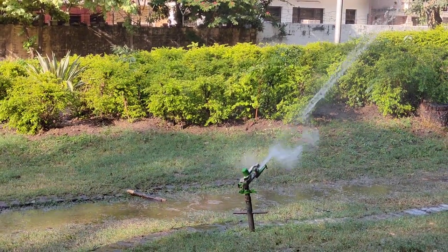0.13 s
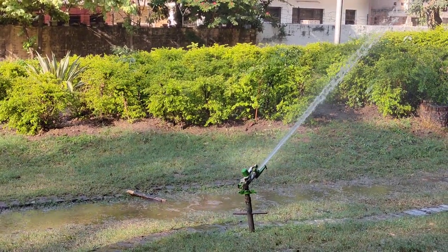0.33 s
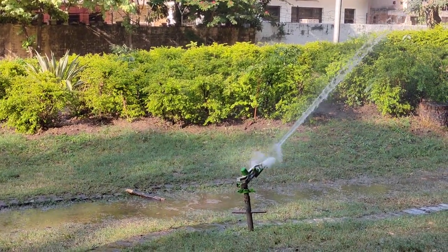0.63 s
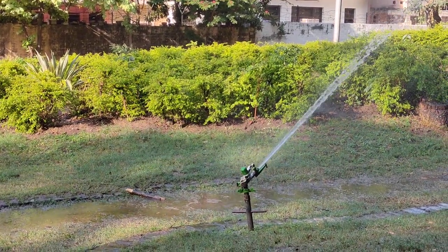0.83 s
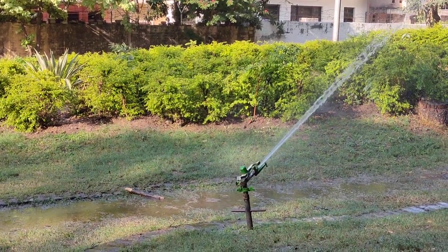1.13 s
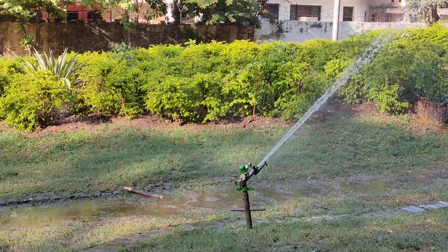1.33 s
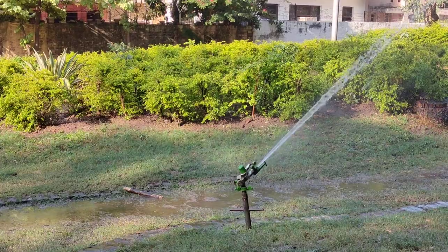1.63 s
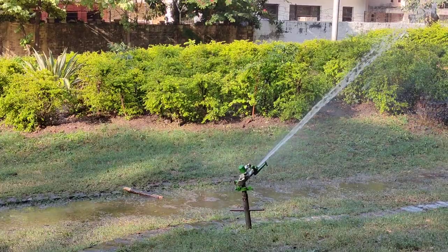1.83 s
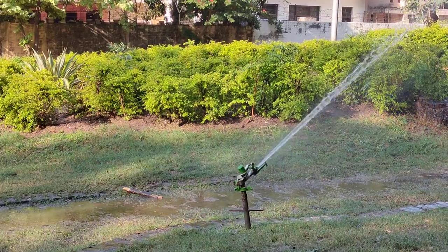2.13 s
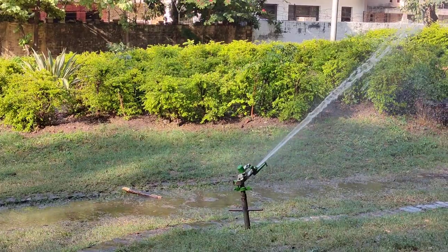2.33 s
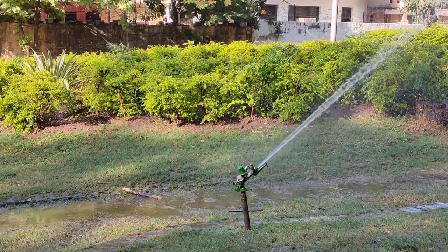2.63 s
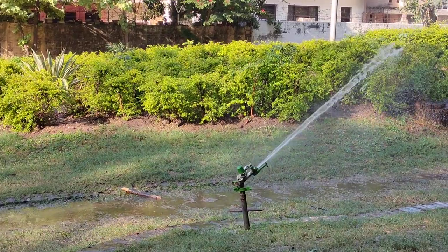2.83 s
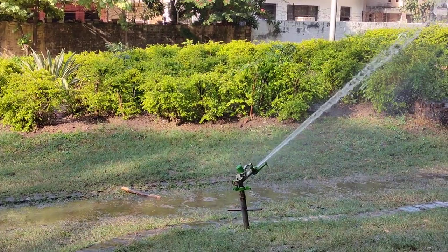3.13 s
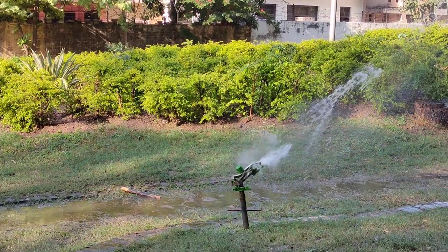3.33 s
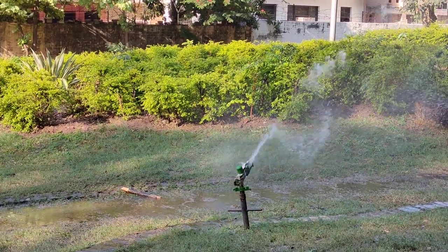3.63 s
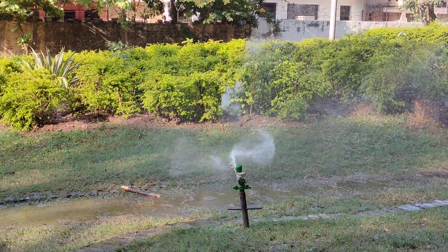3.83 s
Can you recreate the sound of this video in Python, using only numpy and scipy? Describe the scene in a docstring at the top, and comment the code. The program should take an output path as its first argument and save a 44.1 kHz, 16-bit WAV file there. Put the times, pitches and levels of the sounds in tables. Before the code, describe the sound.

A lawn impact sprinkler gives sharp, dry metallic-plastic clacks from 0.2 to 3.35 seconds, about every 0.26 seconds, each with a tiny rattle and a short hissing spray burst full of droplets. From 3.45 seconds it chatters about fifteen times a second, splashier and softer, until near the end at 4. Faint jet hiss persists; irregular low wind puffs thump the close-sounding stereo microphone, with slight garden reflections.

```python
"""Impact sprinkler on a lawn

The swinging arm cuts the jet nearly four times a second: struck modes ring and spray bursts as noise and drops.
It then trips into a fast return, chattering at about fifteen strokes a second. The free jet hisses
throughout as coloured noise, a near surface reflects the strokes, and puffs of wind buffet the microphone
ports as low rumble, rasp and slaps."""
import sys
import numpy as np
from scipy import signal
from scipy.fft import rfft, irfft, next_fast_len
from scipy.io import wavfile
from scipy.ndimage import uniform_filter1d, map_coordinates

SR = 44100
rng = np.random.default_rng(int(sys.argv[2]) if len(sys.argv) > 2 else 0)


def master(y):
    """Save y as 16-bit WAV."""
    cut = np.clip(np.atleast_2d(y).T, -1, 1)
    pcm = np.round(cut * 32767)  # scale
    wavfile.write(sys.argv[1], SR, pcm.astype(np.int16))


N = 176400  # samples: 4 s

# Knocks of the slow forward strokes: start_s, relative level_db
FORWARD_STROKES = [(0.219, -19.5), (0.48, -21), (0.7414, -20), (1.0023, -20.5), (1.2645, -20.5),
                   (1.5267, -20), (1.788, -20.5), (2.0489, -19.5), (2.3105, -19.5), (2.5698, -19.5),
                   (2.8302, -19.5), (3.0891, -19.5), (3.3493, -17.5)]
# Knocks of the fast return strokes: start_s, relative knock_db, relative spray_db
RETURN_STROKES = [(3.451, -19.5, -34), (3.516, -21, -34.5), (3.585, -22, -33.5), (3.652, -23, -35),
                  (3.718, -22, -35), (3.782, -25, -34.5), (3.843, -22.5, -36.5), (3.905, -23, -36),
                  (3.97, -24.5, -36)]
# Further contacts just before and after each knock, lighter or harder:
# delay_s, level_db re knock, centre_hz and width_hz of the modes they ring
FORWARD_RATTLE = [(-.0018, -16, 3160, 1000), (.0098, -6.5, 2970, 1400), (0.0156, -11.5, 2690, 1000),
                  (.024, -9, 3050, 600)]
RETURN_RATTLE = [(-.0215, -10.5, 2840, 1200), (-.0062, -8, 2300, 1300), (.0096, 3, 3220, 700)]
# Modes of the arm and head: pitch_hz, relative left_db, relative right_db, t60_s
HEAD_MODES = [(590, -16.5, -18.5, 0.02), (945, -29, -19.5, 0.026), (1346, -6.5, -9.5, 0.01),
              (1815, 0.5, -3.5, 0.017), (2075, -11.5, -12.5, 0.023), (2960, -12, -11, 0.039),
              (3303, -14, -14.5, 0.026), (3803, -5, -13.5, 0.024), (4440, -11, -28, 0.025),
              (6617, -4.5, -27, 0.039), (7830, -27, -11, 0.02)]
# Small ticks, some of them late bounces of the arm after a knock: start_s, level_db, pitch_hz
SMALL_TICKS = [(0.4395, -34, 1250), (0.4435, -39, 1550), (0.4475, -32.5, 2150), (.541, -34.5, 2350),
               (.767, -24.5, 2620), (3.371, -21, 3030), (3.404, -26, 2810)]
# Spectra of spray and jet hiss as picked up, with the colour and notches of microphones and recorder:
# frequency_hz, relative left_db, relative right_db
SPRAY_SPECTRUM = [(600, -10.5, -14), (1320, -9.5, -11), (1740, -0.5, -0.5), (2270, -2.5, -14),
                  (3070, -1, -1.5), (3830, -3.5, -7.5), (5110, -11.5, -16.5), (5750, -6, -5.5),
                  (6730, 4.5, -6.5), (6880, 0.5, -5), (7980, -10, 3), (9060, -8.5, -7.5),
                  (10600, -16.5, -14), (13600, -8, -19.5), (15800, -14, -18)]
HISS_SPECTRUM = [(400, 1, -2), (1050, -4, -3.5), (1630, -0.5, -3), (2220, -2, -3), (3450, -4, -4),
                 (4330, -7, -13.5), (5060, -17, -37), (5640, -7, -27), (6800, -0.5, -6), (7200, -4.5, -9.5),
                 (7850, -14, 0), (8900, -12.5, -9), (10460, -26, -31.5), (11900, -10.5, -32),
                 (13600, -2.5, -35), (16000, -14, -39)]
# Colour of the spray on the fast return: frequency_hz, gain_db over the forward spray
RETURN_COLOUR = [(800, -5), (1800, -1), (2900, 1), (4300, 1), (5500, -2.5), (7000, 0), (9500, 0.5),
                 (14000, -1)]
# Likeness of left and right in the water sounds: frequency_hz, correlation (no unit)
WATER_CORRELATION = [(400, 0.64), (1500, 0), (3000, 0.17), (5000, 0.033), (15000, 0.15)]
# Echo path delay from the near surface: left delay_s, right delay_s
ECHO_DELAYS = [0.0083, 0.0099]
# Eddies that slap a port: start_s, relative level_db, left_minus_right_db, pitch_hz
PORT_SLAPS = [(0.171, -28.5, -28, 231), (0.546, -25, -33, 330), (0.575, -28, -28, 260),
              (0.587, -25, -30, 280), (0.594, -28, -29, 240), (1.407, -24, -27, 240),
              (1.576, -22, -25.5, 255), (1.584, -25.5, -25.5, 200), (2.651, -31.5, 21, 170),
              (2.807, -28.5, -18, 230), (2.996, -23, -29, 223), (3.277, -26, -18, 302),
              (3.648, -25, -25, 204)]
# Puffs of wind: start_s (centre), length_s, relative left_db, relative right_db
WIND_PUFFS = [(0.104, 0.02, -58, -23.5), (0.146, 0.011, -58, -24), (0.175, 0.018, -45.5, -26),
              (0.261, 0.011, -60, -23), (0.283, 0.013, -60, -29), (0.358, 0.031, -61, -33),
              (0.404, 0.017, -51, -20), (0.576, 0.039, -43.5, -21), (0.624, 0.023, -50, -21.5),
              (0.75, 0.021, -29, -51), (0.937, 0.016, -50, -34.5), (1.135, 0.016, -50, -35.5),
              (1.378, 0.013, -48, -29), (1.414, 0.021, -54, -22), (1.456, 0.017, -48, -21.5),
              (1.503, 0.035, -34, -37), (1.534, 0.015, -35, -24), (1.572, 0.024, -35, -18),
              (1.775, 0.024, -50, -30.5), (1.809, 0.013, -35, -19.5), (1.954, 0.037, -25, -50),
              (2.013, 0.011, -32, -50), (2.655, 0.015, -32, -45), (2.758, 0.033, -42, -23),
              (2.795, 0.022, -38, -21.5), (2.907, 0.014, -46, -24.5), (2.958, 0.016, -54, -24),
              (2.995, 0.013, -60, -19), (3.133, 0.025, -58, -31.5), (3.186, 0.022, -53, -33),
              (3.242, 0.02, -45, -25.5), (3.259, 0.0085, -18, -38), (3.272, 0.022, -31, -23),
              (3.459, 0.036, -59, -23.5), (3.574, 0.027, -31.5, -41), (3.647, 0.018, -47, -22.5),
              (3.796, 0.033, -53, -34)]
# Wind spectra in the ports, body and rasp of strong puffs: frequency_hz, relative level_db
RUMBLE_SPECTRUM = [(20, -30), (50, -10), (90, 3.5), (140, -1.5), (250, -14), (450, -36.5), (1000, -58),
                   (3000, -100)]
RASP_SPECTRUM = [(60, -2), (200, 1), (400, -0.5), (800, -20), (1600, -50), (5000, -80)]
# Light breeze between the puffs, its spectrum: frequency_hz, relative level_db
BREEZE_SPECTRUM = [(20, -10), (45, -4), (90, 4), (140, -2.5), (250, -13), (450, -36), (1000, -38),
                   (3000, -100)]
# Level of the breeze over time: time_s, left_db, right_db
BREEZE_LEVEL = [(0, -43.5, -41), (.6, -47, -37.5), (1.1, -46, -45), (1.5, -44, -38.5), (1.95, -41, -42.5),
                (2.2, -50.5, -48), (2.55, -53, -47.5), (2.8, -50, -38), (3.3, -43, -38.5),
                (4, -47.5, -42.5)]

# Gains in dB, times in s, frequencies in Hz
KNOCK_DB, KNOCK_RISE_S = -2.5, 0.00078
CRACK_DB, RETURN_CRACK_DB, CRACK_T60_S = -13, -9.5, 0.0098
RETURN_TOP_HZ = 5500  # the lighter return blows leave higher modes quiet
TICK_T60_S = 0.0097
FORWARD_SPRAY_DB, GRAZE_DB, GRAZE_LEAD_S = -14.5, -5, 0.0079
RETURN_SPRAY_DB, SPLASH_DB, SPLASH_LEAD_S = -0.37, -8.5, 0.0057
DROP_DB, DROP_HZ, DROPS_PER_S = -10, 2880, 520
DROP_SPREAD, DROP_CYCLES = 0.382, 13.8  # spread of log pitch; decay in cycles to -60 dB
HISS_DB, MIST_DB, MIST_T60_S = -51, -31.5, 0.58
ECHO_DB, GARDEN_DB, GARDEN_T60_S = -12.5, -15, 0.14
SLAP_DB, SLAP_T60_S, SLAP_RISE_S, SLAP_TOP_HZ = 12, 0.012, 0.00054, 1180
PUFF_DB, RASP_DB = -0.5, -16
TOP_HZ = 15950


def knocks(scatter_db=1.6, detune=0.028, rattle_scatter_db=2.1, rattle_jitter_s=0.000785):
    """Modal excitation: each contact rings the head's short modes a little differently, with crack and rattle."""
    out = np.zeros((2, N))
    t = np.arange(SR // 10) / SR
    hz, left, right, t60 = np.transpose(HEAD_MODES)
    cracks = noise(SPRAY_SPECTRUM, WATER_CORRELATION)

    def strike(weight):
        """Modal superposition: one contact sums the weighted modes."""
        level, shift, phase = rng.standard_normal((3, len(hz)))
        pitch = hz * (1 + detune * shift)
        modes = ring(pitch[:, None], t60[:, None], KNOCK_RISE_S, np.pi * phase[:, None])
        gains = amp(np.array([left, right]) + scatter_db * level) * weight
        return gains @ modes

    soft = 1 / np.sqrt(1 + (hz / RETURN_TOP_HZ) ** 8)
    passes = [(FORWARD_STROKES, 1, CRACK_DB, FORWARD_RATTLE),
              (RETURN_STROKES, soft, RETURN_CRACK_DB, RETURN_RATTLE)]
    for strokes, weight, crack_db, rattle in passes:
        for s, db, *_ in strokes:
            cut = cracks[:, rng.integers(N - len(t)):][:, :len(t)]
            crack = cut * amp(crack_db - 60 * t / CRACK_T60_S)
            add(out, s, amp(db + KNOCK_DB) * (strike(weight) + crack))
            for delay, contact_db, centre, width in rattle:
                late, harder = rng.standard_normal(2)
                contact = strike(np.exp(-((hz - centre) / width) ** 2))
                gain = amp(db + contact_db + rattle_scatter_db * harder)
                add(out, s + delay + rattle_jitter_s * late, gain * contact)
    return out


def spray(grain_db=0.5, flutter_db=0.4, lead_s=0.049):
    """Jet break-up: the arm grazes, then shatters the jet; on the return it sits in the jet before each knock."""
    # Independent bursts add in power
    forward_power, return_power, splash_power = np.zeros((3, N))
    for s, db in FORWARD_STROKES:
        graze = amp(GRAZE_DB) * burst(s - GRAZE_LEAD_S, attack_s=0.0037, hold_s=0.004, t60_s=0.013)
        cut = burst(s, attack_s=0.0013, hold_s=0.016, t60_s=0.1)
        forward_power += amp(db + FORWARD_SPRAY_DB) ** 2 * (graze ** 2 + cut ** 2)
    for s, _, db in RETURN_STROKES:
        dip = burst(s - lead_s, attack_s=0.022, hold_s=0.024, t60_s=0.13)
        return_power += (amp(db + RETURN_SPRAY_DB) * dip) ** 2
        splash = burst(s - SPLASH_LEAD_S, attack_s=0.0063, hold_s=0.0099, t60_s=0.039)
        splash_power += (amp(db + SPLASH_DB) * splash) ** 2
    unevenness = amp(grain_db * wobble(1500) + flutter_db * wobble(220))
    water = unit(noise(SPRAY_SPECTRUM, WATER_CORRELATION) * unevenness)
    water = unit(water + amp(DROP_DB) * drops())
    returning = filtered(water, lambda hz: amp(along(RETURN_COLOUR, hz)))
    thrown = np.sqrt(splash_power) * drops()
    return np.sqrt(forward_power) * water + np.sqrt(return_power) * returning + thrown


def drops(size_db=5.5):
    """Impact superposition: many tiny decaying sines at random times make a dense patter of rms 1."""
    count = int(DROPS_PER_S * N / SR)
    pitch, size, sign = rng.standard_normal((count, 3)).T[:, :, None]
    k = np.arange(SR // 100)
    cycles = DROP_HZ * np.exp(DROP_SPREAD * pitch) * k / SR
    decay = amp(size_db * size - 60 * cycles / DROP_CYCLES)
    grains = decay * np.sin(2 * np.pi * cycles) * np.sign(sign)
    places = rng.integers(N, size=(count, 1)) + k
    return unit(np.bincount(places.ravel(), grains.ravel(), N)[:N])


def ticks():
    """Damped resonance: small single-mode ticks, some of them late bounces of the arm after a knock."""
    out = np.zeros((2, N))
    for s, db, hz in SMALL_TICKS:
        add(out, s, amp(db) * ring(hz, TICK_T60_S, rise_s=0.00056)[None])
    return out


def jet(waver_db=0.08, grain_db=1.45):
    """Turbulent noise: the free jet hisses steadily and a fading mist follows each stroke."""
    level = amp(HISS_DB + waver_db * wobble(22) + grain_db * wobble(900))
    steady = level * noise(HISS_SPECTRUM, WATER_CORRELATION)
    mist_power = np.zeros(N)
    for s, db, *_ in [*FORWARD_STROKES, *RETURN_STROKES]:
        mist = burst(s, attack_s=0.025, hold_s=0.032, t60_s=MIST_T60_S)
        mist_power += (amp(db + MIST_DB) * mist) ** 2
    return steady + np.sqrt(mist_power) * noise(SPRAY_SPECTRUM, WATER_CORRELATION)


def garden(x):
    """Reflection and scattering: one near echo and a short diffuse tail from lawn and hedge."""
    t = np.arange(SR // 4) / SR
    tail = rng.standard_normal((2, len(t))) * amp(-60 * t / GARDEN_T60_S)
    scatter = signal.fftconvolve(x, tail / np.linalg.norm(tail[0]), axes=1)[:, :N]
    # A linear phase response is a pure delay
    echo = filtered(x, lambda hz: np.exp(-2j * np.pi * np.outer(ECHO_DELAYS, hz)))
    return x + amp(GARDEN_DB) * scatter + amp(ECHO_DB) * echo


def slaps():
    """Pressure transient: the hardest eddies hit a port with a steep front and one quick swing."""
    out = np.zeros((2, N))
    for s, db, pan, hz in PORT_SLAPS:
        sides = unit(amp([[pan / 2], [-pan / 2]]))
        add(out, s, amp(db + SLAP_DB) * sides * ring(hz, SLAP_T60_S, SLAP_RISE_S))
    return filtered(out, lambda hz: 1 / (1 + 1j * hz / SLAP_TOP_HZ) ** 3)


def wind(lumps_db=3.0, rasp_grows=2.04, evenness=1.0):
    """Turbulent pressure: each port has its own rumble, and the strongest puffs turn raspy."""
    t = np.arange(N) / SR
    puff_power = np.zeros((2, N))
    for s, length, left, right in WIND_PUFFS:
        puff_power += amp([[left], [right]]) ** 2 * np.exp(-np.pi * ((t - s) / length) ** 2)
    puff = np.sqrt(puff_power)
    eddies = noise(RUMBLE_SPECTRUM)
    # Level out the rumble by its running power over 20 ms
    running_power = np.abs(uniform_filter1d(eddies ** 2, SR // 50, axis=1))
    eddies = unit(eddies / running_power ** (evenness / 2))
    when, *ports = np.transpose(BREEZE_LEVEL)
    breeze_gain = amp([np.interp(t, when, db) for db in ports])
    lumps = amp(lumps_db * np.array([wobble(30.13), wobble(30.03)]))
    breeze = breeze_gain * unit(noise(BREEZE_SPECTRUM) * lumps)
    # Rasp grows faster than the puff itself
    rasp_gain = amp(RASP_DB) * puff.max() * (puff / puff.max()) ** rasp_grows
    return amp(PUFF_DB) * puff * eddies + rasp_gain * noise(RASP_SPECTRUM) + breeze


def ring(hz, t60_s, rise_s, phase=0):
    """Damped oscillation: a sine with a short rise and exponential decay."""
    t = np.arange(SR // 10) / SR
    return np.sin(2 * np.pi * hz * t + phase) * amp(-60 * t / t60_s) * (1 - np.exp(-t / rise_s))


def burst(start, attack_s, hold_s, t60_s):
    """Envelope: straight rise, hold, exponential release."""
    t = np.arange(N) / SR - start
    release = amp(-60 * np.maximum(t - attack_s - hold_s, 0) / t60_s)
    return np.clip(t / attack_s, 0, 1) * release


def noise(spectrum, correlation=None):
    """Spectral shaping: coloured stereo noise of rms 1, with the given correlation of its sides."""
    pair = rng.standard_normal((2, N))
    if correlation is not None:
        def mid_side_gains(hz):
            """Correlation as an angle: the cosine of twice the angle is the likeness of the sides."""
            angle = np.arccos(np.clip(along(correlation, hz)[0], -1, 1)) / 2
            return np.array([np.cos(angle), np.sin(angle)])

        mid, side = filtered(pair, mid_side_gains)
        pair = np.array([mid + side, mid - side])
    return unit(filtered(pair, lambda hz: amp(along(spectrum, hz))))


def wobble(rate):
    """Random modulation: a smooth curve through rate random knots a second."""
    knots = rng.standard_normal(int(N * rate / SR) + 4)
    return map_coordinates(knots, [np.arange(N) * rate / SR])


def filtered(x, response):
    """Linear filtering: the spectrum of x times a response of frequency."""
    m = next_fast_len(N + 8192)
    return irfft(rfft(x, m) * response(np.fft.rfftfreq(m, 1 / SR)), m)[..., :N]


def along(points, hz):
    """Logarithmic interpolation: each column of a frequency table, read on a log axis."""
    f, *cols = np.transpose(points)
    return np.array([np.interp(np.log(hz + 1), np.log(f + 1), c) for c in cols])


def amp(db):
    """Level law: decibels to amplitude gain."""
    return 10 ** (np.asarray(db) / 20)


def unit(x):
    """Normalisation: scale to rms 1."""
    return x / np.sqrt(np.mean(x ** 2) + 1e-20)


def add(track, s, sound):
    """Superposition: mix a sound into the track at s seconds."""
    part = track[:, round(s * SR):][:, :sound.shape[1]]
    part += sound[:, :part.shape[1]]


def scene():
    """Superposition of sources: the sprinkler strokes in their garden, the jet, and wind at the microphone."""
    strokes = knocks() + ticks() + spray()
    return garden(strokes) + jet() + wind() + slaps()


def record(dry):
    """Band limiting: the recorder keeps nothing above its top frequency."""
    return filtered(dry, lambda hz: hz < TOP_HZ)


dry = scene()
out = record(dry)
master(out)
```